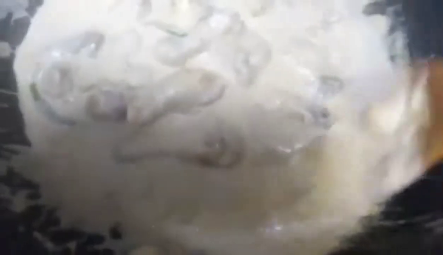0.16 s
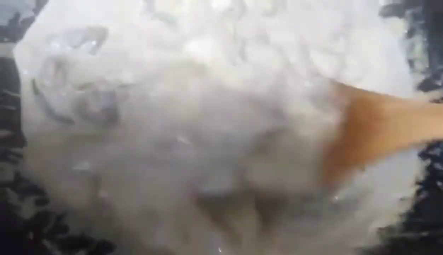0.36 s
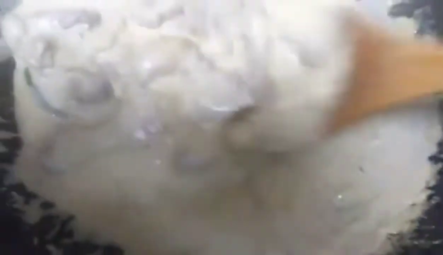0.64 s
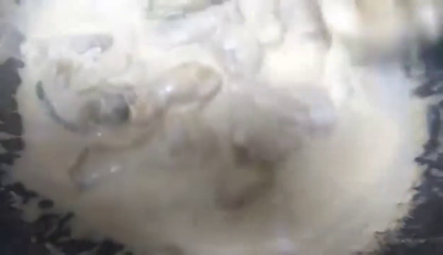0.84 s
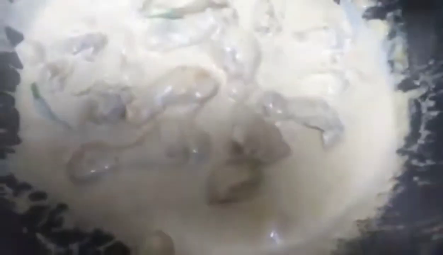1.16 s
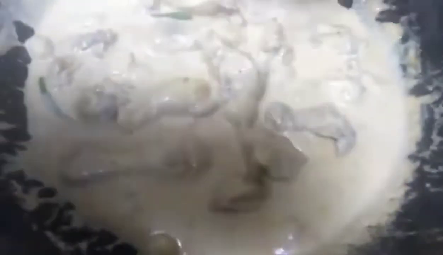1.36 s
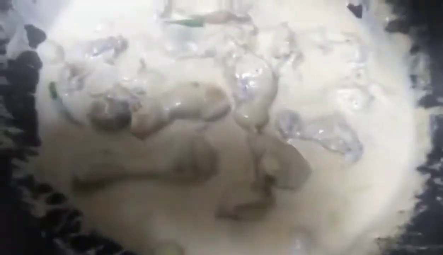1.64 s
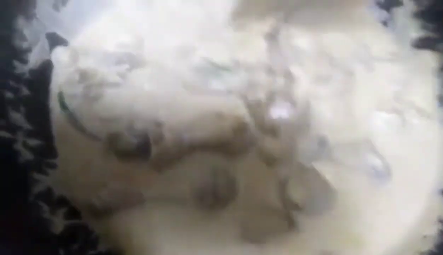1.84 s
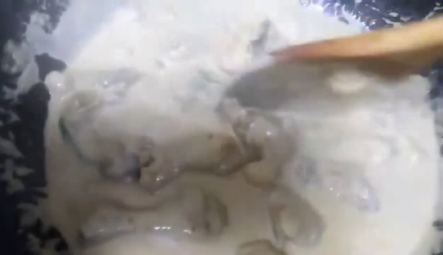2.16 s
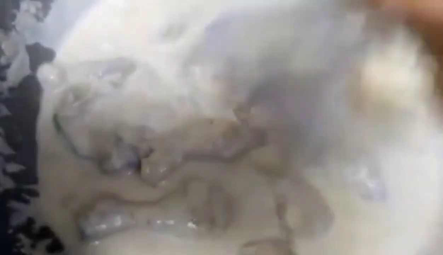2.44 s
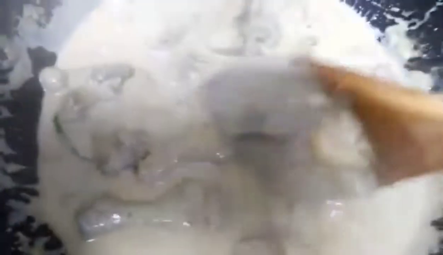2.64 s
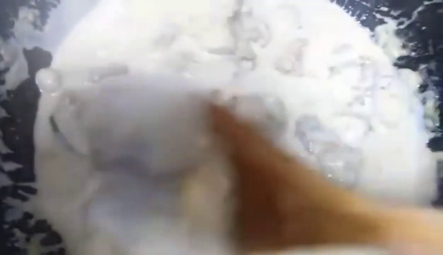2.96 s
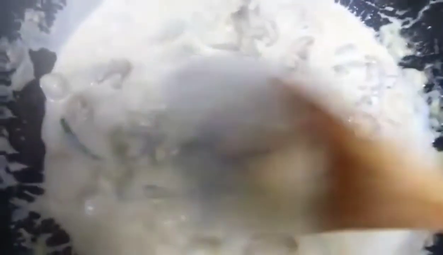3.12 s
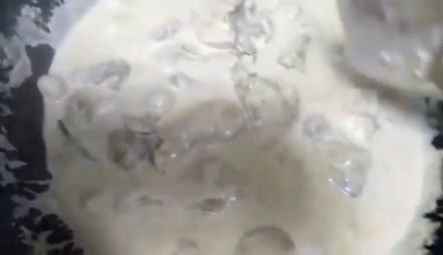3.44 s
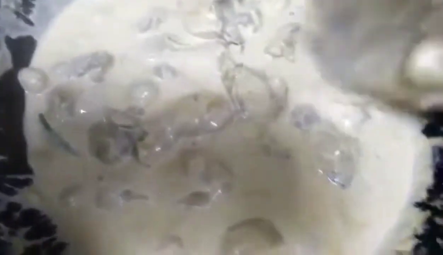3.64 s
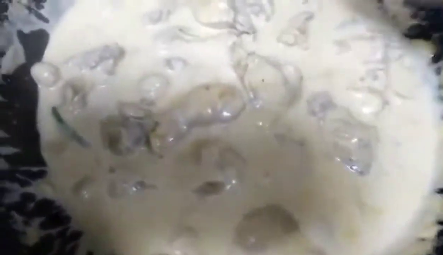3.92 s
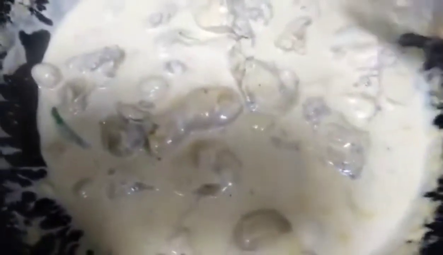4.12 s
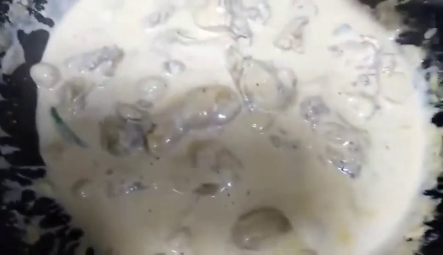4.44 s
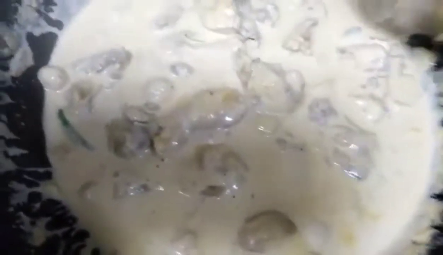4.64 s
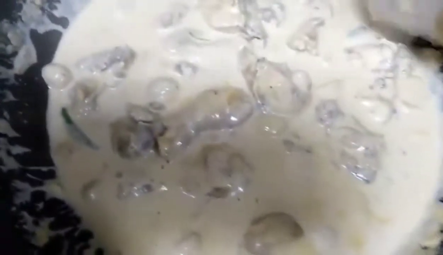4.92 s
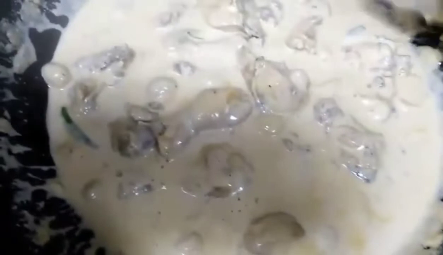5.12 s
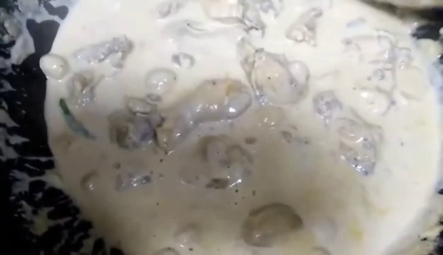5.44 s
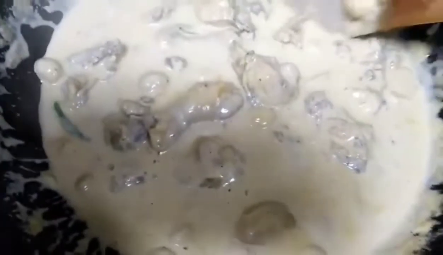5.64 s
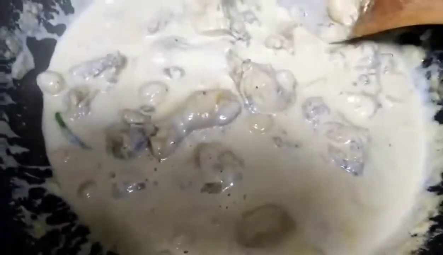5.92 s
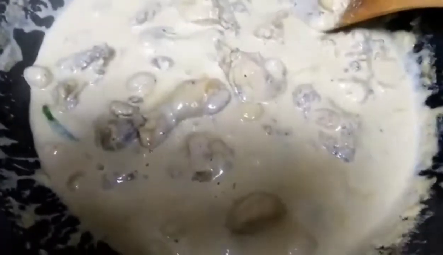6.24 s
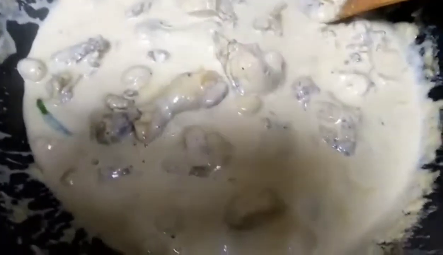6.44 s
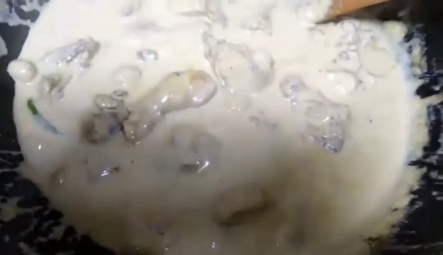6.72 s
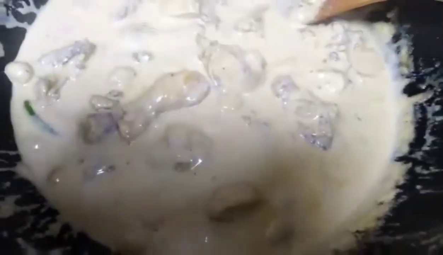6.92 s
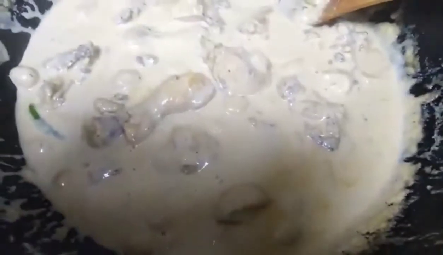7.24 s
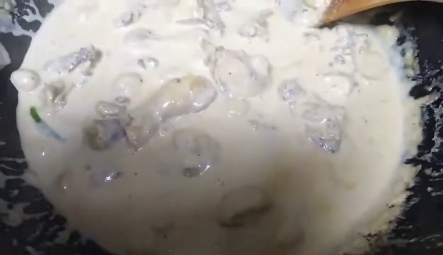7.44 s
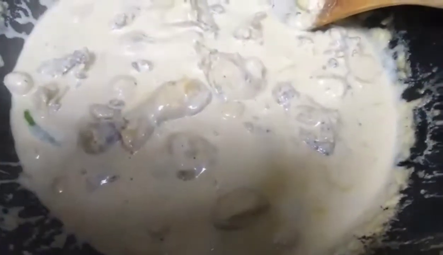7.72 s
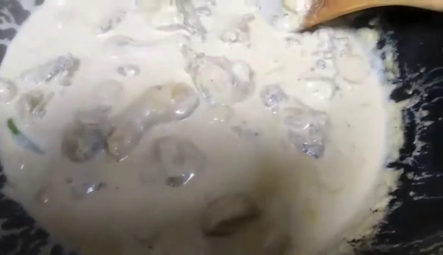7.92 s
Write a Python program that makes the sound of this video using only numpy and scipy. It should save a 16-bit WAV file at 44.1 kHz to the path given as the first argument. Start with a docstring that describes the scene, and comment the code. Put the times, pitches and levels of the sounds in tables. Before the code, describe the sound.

Thick, creamy sauce simmers in a pan close to the microphone, giving irregular small bright pops and occasional lower plops. At the start a wooden spatula scrapes briefly on the rim, with soft dull thuds through the stove. The popping continues, and a second cluster of thuds and plops comes past the middle. Faint fizz, steady hiss and a low hum sit underneath in a small, hard kitchen.

```python
"""In a small, hard kitchen, thick sauce simmers in a pan close to the microphone.
Small steam bubbles snap their films and ring as cavity resonators, giving short bright pops; large
ones resonate lower and plop. The pan's edge fizzes, steam puffs out, and faint thin tones ring.
Friction of a wooden spatula excites the rim, and thuds drive the damped modes of the stove top.
The room reverberates after each bubble, over a steady hiss and a low hum."""
import sys
import numpy as np
from scipy import signal
from scipy.fft import rfft, irfft, next_fast_len
from scipy.io import wavfile
from scipy.ndimage import uniform_filter1d, map_coordinates

SR = 44100
rng = np.random.default_rng(int(sys.argv[2]) if len(sys.argv) > 2 else 0)


def wav_record(signal):
    """Record a signal, one row per channel, as 16-bit PCM in the file named by sys.argv[1]."""
    frames = np.transpose(np.atleast_2d(signal))
    bounded = np.clip(frames, -1, 1)
    # unit amplitude maps onto the largest positive 16-bit level
    quanta = np.round(bounded * 32767).astype(np.int16)
    wavfile.write(sys.argv[1], SR, quanta)


N = 355887

# Small bubbles: t/s, level/dB, f/Hz, balance/dB (left minus right), snap weight/dB, life/cycles
SMALL_BUBBLES = [(0.066, -27.5, 4740, 22.5, -50, 8), (0.1158, -17.5, 4420, 9, -22, 5.4),
                 (0.187, -23, 4160, 3, -40, 2.8), (.3433, -52, 2190, 18, 19, 28),
                 (0.3904, -32.5, 8360, -15, 3, 13), (0.434, -35, 5000, 8, -30, 8.3),
                 (0.441, -31, 4900, 14, -39.5, 42), (0.446, -18.5, 4900, 12, -2, 3.7),
                 (0.452, -33, 4730, 2, 7, 7.2), (0.4812, -25.5, 4650, 7, 10, 10),
                 (0.5, -20, 5100, 10.5, -26, 7.1), (0.784, -30.5, 6700, 13.5, -48, 7.1),
                 (0.826, -37.5, 8450, -10, 14, 4.8), (0.8816, -51.5, 2655, 8, 14, 69),
                 (1.04, -38.5, 6400, 6, -40, 5.4), (1.2252, -29, 5000, 9.5, -0.5, 3.1),
                 (1.406, -32.5, 4640, -2, -17, 6.2), (1.42, -37, 6300, 4, -43, 13),
                 (1.4715, -17, 6500, 3, 3, 6.2), (1.4724, -16, 5550, 2.5, -4, 14),
                 (1.5263, -18.5, 7700, -3, 3, 4.7), (1.599, -38.5, 7100, -15, 3, 6.5),
                 (1.62, -24.5, 6740, 3.5, -48, 8.6), (1.65, -32, 7250, -1, -13, 10),
                 (1.757, -29, 4990, 7.5, -50, 20), (1.807, -48.5, 5800, 28, 6.5, 3.4),
                 (1.898, -40.5, 5330, -6, -1, 28), (1.913, -38, 5400, 10, -43, 7.4),
                 (1.9653, -41.5, 5600, 4, -47, 6.7), (2.107, -29.5, 9430, -13, -1, 7.5),
                 (2.132, -52, 8250, 0, -18, 8), (2.148, -31, 6100, 4, -41, 8.6),
                 (2.178, -31.5, 8300, -3, -2, 19), (2.229, -48.5, 2750, 17, -57, 6.8),
                 (2.2295, -18.5, 6270, 1, -50, 8.6), (2.4057, -29.5, 3380, -7, -40, 7.2),
                 (2.408, -22.5, 8140, -4, -47, 7.5), (2.448, -36, 4780, -6, -46, 12),
                 (2.477, -33.5, 5230, -6, -55, 6.3), (2.517, -24, 7900, -1, -42, 14),
                 (2.528, -28.5, 6400, 0, -35, 14), (2.6, -53, 3050, 36, -48, 13),
                 (2.7342, -36.5, 5300, 15, -46, 8), (2.88, -36.5, 6250, 4, -50, 7.3),
                 (3.015, -26, 5600, 2, -51, 8.3), (3.059, -44.5, 4650, 1, -50, 31),
                 (3.355, -46.5, 5500, 12, -49, 13), (3.3815, -28.5, 7840, -16.5, -34, 5.3),
                 (3.616, -29, 4620, 2, -33, 11.4), (3.8402, -31.5, 6190, 0, -43, 22),
                 (3.895, -47, 7540, -26, -33.5, 6.7), (3.936, -28.5, 5800, 11.5, -54, 10.3),
                 (4.0422, -29, 6000, 9.5, -53, 7.5), (4.085, -40.5, 5330, 15, -56, 17),
                 (4.1586, -32, 11500, 2, -12, 8.1), (4.1604, -14, 14600, -5, -40, 13),
                 (4.1618, -14, 10400, 3, -40, 7), (4.1602, -17, 2580, 4, -50, 8.5),
                 (4.1604, -4, 5340, 6.5, 3.5, 3), (4.403, -24.5, 6500, -3, -44, 7.7),
                 (4.4385, -18.5, 5530, -0.5, -53, 7.4), (4.4903, -17.5, 6100, -5.5, -47, 4),
                 (4.5063, -21.5, 5320, 8, -45, 11), (4.5767, -20.5, 6960, 1, -37, 3.9),
                 (4.628, -23, 6840, 0, -46, 7.2), (4.7303, -48, 3200, 8, -65, 11),
                 (4.7303, -25, 6100, -3, -52, 10), (4.7585, -30.5, 6100, 2, -27, 15),
                 (4.792, -43.5, 8900, -24, 14.5, 18), (4.953, -32.5, 6840, -18, -50, 7.3),
                 (4.983, -33, 5800, 8, -61, 11), (5.012, -22.5, 4940, 10, -48, 12.7),
                 (5.034, -26, 5330, 5.5, -63, 6.2), (5.049, -20.5, 6920, -5, -61, 8.9),
                 (5.079, -28.5, 7580, -12, -55, 8.1), (5.243, -27, 7870, -3, -47, 10.4),
                 (5.256, -49, 2410, 6, -45, 16), (5.3094, -28, 5800, -1, -59, 5.7),
                 (5.3857, -33, 6430, -1, -20, 12), (5.495, -27.5, 5500, -11.5, -44, 11.3),
                 (5.521, -33, 5800, 13, -15, 11), (5.547, -26, 7660, -20.5, -9, 4.4),
                 (5.591, -37, 7200, -6.5, -16, 6), (5.6382, -48, 2610, 9, 13.5, 2.1),
                 (5.7152, -27, 5070, 0, -60, 16.6), (5.748, -40, 7100, -4, -32, 8.2),
                 (5.7958, -47, 7760, -14, -2, 12), (5.832, -21, 6430, -2, -50, 6.8),
                 (5.9192, -36, 4320, -5, -3.5, 11), (5.953, -46.5, 2730, 27, -45, 5.5),
                 (5.99, -50, 6140, 13, 1, 67), (6.0858, -43, 6500, 3, -42, 7.5),
                 (6.133, -26.5, 4520, 12, -17, 16), (6.1565, -46, 4390, 9, -34, 20),
                 (6.163, -47, 4400, 3, -40, 14.6), (6.1897, -33, 4660, 8, -51, 15),
                 (6.246, -41, 4550, 7, -23, 60), (6.298, -32, 6300, -1, -7, 13),
                 (6.376, -20.5, 6670, 1.5, -57, 5.6), (6.493, -40.5, 6130, -8, -49, 18),
                 (6.6394, -32, 5800, 9, -43, 29), (6.692, -32, 7250, 12, -35, 8.1),
                 (6.751, -21.5, 6560, 1, -45, 11.5), (6.7544, -29.5, 4840, 11, -55, 11),
                 (6.8175, -25, 4970, 3, -12.5, 9.9), (6.977, -24, 7700, 1, -27, 11.4),
                 (6.9708, -37.5, 4600, -10, -30, 9), (6.9782, -22.5, 4760, 11, -52, 18),
                 (7.104, -43, 7540, -3, -20, 6.8), (7.2282, -40.5, 5640, 18, -48, 14),
                 (7.268, -34, 6000, 1, -65, 4.5), (7.272, -50, 2980, 28, -56, 53),
                 (7.279, -19, 7100, 0, -31, 7.2), (7.286, -22.5, 7220, 5, -9, 7.3),
                 (7.338, -28, 5960, 7, -55, 6.4), (7.37, -38, 5900, 6, -48, 6.7),
                 (7.4801, -23.5, 7000, 2, -48, 6.7), (7.487, -37.5, 6260, 11, -31, 16),
                 (7.681, -16, 6440, 2, -43, 6.7), (7.681, -43, 2050, 13, -38, 2.7),
                 (7.688, -49, 6500, 3, -36, 8.6), (7.763, -38, 8100, -18, -33, 4.9),
                 (7.808, -32, 7500, -3, -32, 4.5), (7.83, -46, 4650, 17, -50, 35),
                 (7.8427, -22.5, 7230, 6, -48, 7), (7.849, -54, 3050, 29.5, -48, 17),
                 (7.955, -30.5, 5620, 6, -56, 23), (7.972, -22.5, 6700, 7, -52, 18),
                 (8.0622, -19.5, 7400, 4, -20, 4)]
# Large bubbles: t/s, level/dB, f/Hz, balance/dB, life/cycles, reverberant-to-direct ratio/dB
LARGE_BUBBLES = [(0.067, -25, 1140, 1.5, 1.9, 14.5), (0.08, -32, 515, -12, 2.18, 5),
                 (0.346, -47.5, 1710, -20, 18, -3), (0.886, -38.5, 1810, -6, 15.5, -5.5),
                 (1.532, -59.5, 870, -8, 1.9, 26), (1.714, -34, 990, -4, 8, -18),
                 (1.72, -12.5, 987, -3.5, 5.1, -9), (1.766, -12, 1165, -5, 2.85, -4.5),
                 (1.771, -19, 1200, 11, 2.6, -7), (1.772, -37, 228, -5.5, 4, 0),
                 (2.299, -66.5, 281, 22, 7.5, 19), (3.333, -60.5, 1460, 28, 19, -7),
                 (3.611, -27, 2250, 12.5, 10, -0.5), (4.192, -57, 272, 12, 7.9, 10),
                 (4.982, -53, 508, 1, 3.8, 8), (5.739, -25, 590, -4.5, 8, 1), (5.755, -26, 482, 3.5, 6, -4),
                 (5.772, -38, 524, 5, 7, -2), (5.795, -44, 592, 12, 15, -8), (5.881, -39, 1375, 13, 7.2, 7),
                 (5.897, -29.5, 1184, 6.5, 6.1, 6.5), (5.946, -37, 1534, -0.5, 8, 12.5),
                 (5.957, -22, 1100, 5.5, 5.1, -6.5), (6.639, -67.5, 1746, 19, 12.5, 13),
                 (6.833, -40.5, 1098, 12.5, 16.3, -6), (6.975, -41, 382, 9, 11.2, -7),
                 (6.995, -18, 359, -2, 3.5, -4.5), (7.005, -32, 441, -11, 6, -18),
                 (7.055, -39, 275, -4.5, 6, -8), (7.072, -45, 308, -3, 9, -7),
                 (7.876, -41, 987, 0, 9.1, 1.5)]
# Spectrum of a snapping film: f/Hz, level/dB
FILM_SPECTRUM = [(590, -87), (1000, -32), (1650, -49.5), (2480, -0.5), (3630, -7.5), (4430, -27), (5580, 6),
                 (6650, 13), (9100, 5), (10300, 7), (12600, 8.5), (13800, -6.5), (16100, -19.5)]
# Left-right difference of the snap at the microphone ports: f/Hz, balance/dB
FILM_BALANCE = [(60, -7), (180, 8), (550, 5), (1650, 37.5), (4970, -3.5), (15000, -18.5)]
# Frying at the bare edge of the pan: t/s, coarse level/dB, fine level/dB, finest level/dB
FIZZ_LEVELS = [(0.0, -58, -83, -103), (0.2, -61, -83, -63.5), (0.4, -56.5, -51.5, -53.5),
               (0.63, -77, -96, -77), (0.9, -68, -86, -82), (1.302, -80.5, -103, -81),
               (1.66, -69, -70, -79), (2.0, -72.5, -104, -83), (2.67, -69, -58.5, -80),
               (3.1, -104, -79, -83.5), (3.75, -68.5, -78, -82), (4.09, -58.5, -60, -101),
               (4.25, -44.5, -79, -91), (4.4, -81, -90, -107), (4.54, -69, -76, -92), (4.72, -63, -60, -81),
               (4.95, -63, -56, -101), (5.24, -69, -93, -80.5), (5.66, -70.5, -88.5, -84.5),
               (6.199, -74.5, -78.5, -80), (6.61, -70.5, -60.5, -93), (7.08, -73.5, -101, -77.5),
               (7.4, -76, -71, -83), (7.7, -73, -83, -86), (8.07, -58, -94, -84)]
# Puffs of steam: t/s, level/dB, T60/s
STEAM_PUFFS = [(.33, -68, 0.34), (.86, -62, 0.17), (1.845, -49.5, 0.088), (5.96, -54.5, 0.19),
               (6.26, -56, 0.21), (.12, -75, .6), (7.79, -74, 0.13)]
# Faint ringing tones: t/s, level/dB, f/Hz, glide/(Hz/s), T60/s, balance/dB
THIN_TONES = [(.27, -58, 3700, -73, 0.59, 14), (.13, -54, 2236, -1, .6, 5), (1.47, -61, 3540, -3, 0.66, 4),
              (2.16, -63.5, 3550, -6, 0.36, 11), (.3, -59, 2280, -3, 0.25, 18),
              (.5, -62, 3680, -10, 0.72, 14.5), (.48, -58.5, 2300, -700, 0.31, 28),
              (.6, -55, 2200, -300, 0.28, 28.5), (1.08, -67.5, 3494, -1, 0.87, 14),
              (2.07, -72, 3550, -8, 0.5, 15), (2.42, -62, 3930, 1, 0.43, 22),
              (2.42, -56.5, 2900, -1, 0.24, 21), (2.62, -66, 5390, -12, 0.82, 11),
              (2.999, -70.5, 2640, 3, 0.51, 28.5), (3.031, -63.5, 1750, 91, 0.32, 16.5),
              (3.749, -64.5, 3744, 2, 0.25, 29), (3.93, -61.5, 2335, -200, 0.4, 24.5),
              (4.2, -62.5, 2160, -100, 0.68, 20), (4.23, -61.5, 3726, -54, 1, 9.5),
              (5.24, -61, 1600, 0, 0.21, 3), (5.32, -59.5, 1495, -100, 0.33, -5),
              (5.768, -57, 1760, 2, 0.19, 23), (6.191, -64.5, 2685, -1, 0.27, 29),
              (6.96, -59, 3860, -200, 0.88, 6), (7.029, -62, 1750, 11, 0.19, 25.5),
              (7.301, -68.5, 1484, 1, 0.45, -15.5)]
# Shocks through the stove: t/s, boom level/dB, body level/dB, T60/s
STOVE_SHOCKS = [(0.077, -41.5, -38.5, 0.26), (0.13, -29, -54, 0.47), (0.238, -37.5, -56, 0.36),
                (5.282, -35.5, -57, 0.3), (5.37, -36, -72, 0.52), (5.509, -45, -56, 0.21),
                (5.752, -75, -38, 0.36), (5.811, -52, -31, 0.087), (5.898, -35, -34, 0.25),
                (5.914, -30, -27, 0.21), (5.99, -37, -35, 0.15)]
# Low modes of the stove top: f/Hz, level/dB
BOOM_MODES = [(62, -6), (99, 0), (125, -9)]
# Its higher modes: f/Hz, level/dB
BODY_MODES = [(180, 2), (215, -6), (260, -5.5)]
# The spatula catching on the rim: t/s, level/dB, T60/s
SPATULA_CATCHES = [(0.056, -37.5, 1.0), (0.441, -27.5, 0.048), (0.482, -25.5, 0.053), (.782, -36, 0.022)]
# Spectrum of the rubbed pan: f/Hz, level/dB
RIM_SPECTRUM = [(240, -43), (400, -4.5), (1040, -10.5), (1690, -12.5), (1880, -13), (2220, -1),
                (2900, -1.5), (3700, -1), (4880, -7), (6510, -20), (12500, -68), (15000, -82)]
# Spectrum of the background hiss: f/Hz, level/dB
HISS_SPECTRUM = [(13, -31.5), (22, -48.5), (44, -3.5), (101, -4.5), (201, -6), (347, -3), (567, -13),
                 (853, -12), (1400, -18), (2610, -18), (3340, -22), (6090, -24), (7580, -39),
                 (11700, -46.5), (15000, -60.5)]
# Likeness of that hiss in the two channels: f/Hz, coherence
HISS_COHERENCE = [(60, 0.25), (250, 1), (1000, 0.22), (3000, 0.028), (15000, 0.08)]
# Partials of the hum: f/Hz, level/dB
HUM_PARTIALS = [(100, -69.5), (180, -81), (272, -76), (360, -84.5)]
# Reverberation time of the kitchen: f/Hz, T60/s
ROOM_T60 = [(150, 0.22), (1000, 0.24), (5000, 0.18), (12000, 0.14), (13500, 0.054)]
# Likeness of the reverberation in the two channels: f/Hz, coherence
ROOM_COHERENCE = [(200, 1), (700, 0.86), (2000, 0.044)]
# The highest treble is dulled above 13 kHz: f/Hz, gain/dB
TREBLE_ROLLOFF = [(12800, -0.5), (13600, -11), (16000, -12.5)]

BUBBLE_SAMPLES, BURST_S = 2048, 0.014  # length of a bubble's sound; instant of rupture within a pop
FRAY_S, STEAM_S = 0.0006, 0.0021  # time constants around the rupture
STEAM_DB, PAT_DB = -15.5, -27.5
ONSET_S, ONSET_DB = 0.0032, -9  # a faint hiss swells just before each pop
LAG_SAMPLES, LAG_SPREAD = 11, 9  # the left port hears later; bubbles burst all over the pan
GLANCE_S, GLANCE_DB = 0.0012, -0.5  # range of delay and greatest gain of the pan wall's reflection
SPATTER_DB, SPATTER_T60_S = -37.5, 0.35
PAN_DB, PAN_T60_S = -57, 0.69
WALL_S, WALL_GAIN = 0.00842, 1.6  # one clear echo from a near wall
TOP_HZ = 16300


def small_bubbles(rooms):
    """Direct sound falls with distance: fainter pops are farther away, so more reverberant."""
    out = np.zeros((2, N + SR))
    for k, (s, db, hz, balance_db, snap_db, cycles) in enumerate(SMALL_BUBBLES + tiny_bubbles()):
        place, *glances = rng.uniform(-1, 1, size=3)
        sound = amp(db) * pop(hz, balance_db, snap_db, cycles, glances)
        lag = LAG_SAMPLES + round(LAG_SPREAD * place)
        room_db = -1.5 - 0.1444 * (max(db, -45) + 33.5)
        tail = rooms[k % len(rooms)]
        if k >= len(SMALL_BUBBLES):
            tail = tail[:, :4000]  # tiny pops sink into the hiss early
        add_in_room(out, s + 0.001096 - BURST_S, sound, lag, room_db, tail)
    return out[:, :N]


def pop(hz, balance_db, snap_db, cycles, glances):
    """Impulse excitation: a film frays and snaps, the cavity rings, and the pan wall reflects both."""
    t = np.arange(BUBBLE_SAMPLES) / SR
    freqs = np.fft.rfftfreq(len(t), 1 / SR)
    from_burst = np.abs(t - BURST_S)
    tear = np.arange(len(t)) == round(BURST_S * SR)
    fray = rng.standard_normal(len(t)) * np.exp(-from_burst / FRAY_S)
    film = amp(along(FILM_SPECTRUM, freqs) + along(FILM_BALANCE, freqs) * [[.5], [-.5]])
    snap = irfft(rfft(tear + 0.92 * fray) * film)
    soft_onset = amp(ONSET_DB) * np.exp(-from_burst / ONSET_S) * (t < BURST_S)
    rush = rfft(rng.standard_normal((2, len(t))) * (np.exp(-from_burst / STEAM_S) + soft_onset))
    hiss = irfft(rush * band(freqs, hz, hz / 4.8) ** 4)  # coloured by the cavity
    pat = irfft(rush * band(freqs, 2000, width_hz=2700) ** 2)  # the sauce falls back
    tone = cavity(hz, cycles, rise=0.021, peak_s=BURST_S)
    ring = tone + at_peak(hiss, STEAM_DB) + at_peak(pat, PAT_DB)
    direct = sides(balance_db) * ring + at_peak(snap, snap_db - 4.5)
    reflected = [glance * np.roll(channel, round(abs(glance) * GLANCE_S * SR) + 6)
                 for glance, channel in zip(glances, direct)]
    return direct + amp(GLANCE_DB) * np.array(reflected)


def cavity(hz, cycles, rise, peak_s):
    """Cavity resonance: a few cycles of climbing pitch under a Gaussian envelope."""
    age = (np.arange(BUBBLE_SAMPLES) / SR - peak_s) * hz / cycles
    return np.exp(-(age / .25) ** 2) * np.cos(2 * np.pi * cycles * (age + rise * age * age / 2))


def tiny_bubbles():
    """Random bursting: some bubbles follow the fizz in level, others are freed by a larger neighbour."""
    rows = []
    fizz_s, coarse_db = np.transpose(FIZZ_LEVELS)[:2]
    for when, strength, pitch, side in rng.random((110, 4)):
        s = when * N / SR
        db = np.interp(s, fizz_s, coarse_db) + 4 + 9 * strength ** 2
        rows.append((s, db, 4600 + 3800 * pitch, 12 * side - 3, -35, 18))
    for s, db, hz, balance_db, *_ in rng.choice(SMALL_BUBBLES, size=150):
        wait, strength, pitch, side = rng.random(4)
        s = min(s + 0.0044 - 0.03 * np.log(wait), N / SR)
        db = min(db, -22) - 23.5 + 7.5 * strength
        rows.append((s, db, hz * (0.87 + 0.28 * pitch), balance_db + 8 * (side - .5), -35, 12))
    return rows


def large_bubbles(rooms):
    """A larger cavity resonates lower: these bubbles plop, without a snap."""
    out = np.zeros((2, N + SR))
    for k, (s, db, hz, balance_db, cycles, room_db) in enumerate(LARGE_BUBBLES):
        plop = amp(db) * sides(balance_db) * cavity(hz, cycles, rise=0.037, peak_s=0.563 * cycles / hz)
        add_in_room(out, s, plop, LAG_SAMPLES // 6, room_db, rooms[k % len(rooms)])
    return out[:, :N]


def fizz():
    """Incoherent addition: frying bubbles of three sizes merge into three bands of grainy noise."""
    layers = [noise(lambda f: band(f, hz, width_hz) ** 3, [(hz, .3)], patchy_db=6) * sides(balance_db)
              for hz, width_hz, balance_db in [(5800, 3330, 4), (7760, 1320, 3.5), (10380, 9100, -2)]]
    s, *levels_db = np.transpose(FIZZ_LEVELS)
    crackle_db = -2.5 * flicker(samples=90)
    clumps_db = 3.5 * flicker(samples=700)
    swells = [amp(np.interp(np.arange(N) / SR, s, db)) for db in levels_db]
    return unit(amp(crackle_db + clumps_db)) * sum(swell * layer for swell, layer in zip(swells, layers))


def spatter_and_pan_ring():
    """Free decay: each snap leaves spatter, and each pop excites a mode of the pan."""
    s, pop_db, _, _, snap_db, _ = np.transpose(SMALL_BUBBLES)
    spray = noise(lambda hz: band(hz, 7000, width_hz=9000) ** 2 / (1 + (hz / 12500) ** 16),
                  [(7000, .3)], patchy_db=5)
    mode = noise(lambda hz: band(hz, 2650, width_hz=95) ** 2, [(2660, 0.28)], patchy_db=7)
    spatter = struck_envelope(s, SPATTER_DB + pop_db + snap_db, SPATTER_T60_S) * spray
    ring = struck_envelope(s, PAN_DB + 0.52 * pop_db, PAN_T60_S) * mode
    return spatter * sides(-1.5) + ring * sides(17)


def steam_puffs():
    """Flow noise: thin steam escapes in short puffs of high hiss."""
    hiss = noise(lambda hz: band(hz, 11700, width_hz=3200) ** 3, [(11800, 0.19)], patchy_db=2)
    return swelling_envelope(STEAM_PUFFS, rise_s=0.015) * hiss * sides(-8)


def thin_tones(width_hz=45, rise_s=0.0037):
    """Random modulation: faint tones, each a steady core plus narrow-band noise, glide and falter."""
    out, t = np.zeros((2, N + SR)), np.arange(2 * SR // 3) / SR
    for s, db, hz, glide, t60, balance_db in THIN_TONES:
        white = rng.standard_normal((2, 2, len(t)))
        in_phase, quadrature = filtered(white, lambda f: 1 / (1 + (f / width_hz) ** 2))
        core = 1.3 * in_phase.std()
        phase = 2 * np.pi * (hz * t + glide * t * t / 2)
        falter = amp(3 * unit(filtered(rng.standard_normal(len(t)), lambda f: f < 15)))
        tone = unit(falter * ((in_phase + core) * np.cos(phase) + quadrature * np.sin(phase)))
        envelope = amp(db - 60 * (t / t60) ** 2) * (1 - np.exp(-t / rise_s))
        out[:, round(s * SR):][:, :len(t)] += envelope * sides(balance_db) * tone
    return out[:, :N]


def stove_thuds(rise_s=0.002):
    """Modal vibration: dull shocks ring the stove top, a little differently each time."""
    out, t = np.zeros((2, N + SR)), np.arange(SR // 2) / SR
    attack = (1 - np.exp(-t / rise_s)) ** 2
    for s, boom_db, body_db, t60 in STOVE_SHOCKS:
        for modes, shock_db in [(BOOM_MODES, boom_db), (BODY_MODES, body_db)]:
            for hz, db in modes:
                detune, offset, skew = rng.uniform(-1.24, 1, size=3)
                start_phase = np.pi * offset + .8 * skew * np.array([[1], [-1]])
                mode = np.sin(2 * np.pi * hz * (1 + 0.027 * detune) * t + start_phase)
                out[:, round(s * SR):][:, :len(t)] += amp(shock_db + db - 60 * t / t60) * attack * mode
    return out[:, :N] * sides(-1)


def spatula():
    """Friction: wood catches on the rim in short grains that excite the pan."""
    grit = amp(2 * flicker(samples=120))
    rub = noise(lambda hz: amp(along(RIM_SPECTRUM, hz)), [(500, 0.47), (5000, 0.18)], patchy_db=4.5)
    return swelling_envelope(SPATULA_CATCHES, rise_s=0.013) * unit(grit * rub) * sides(1.9)


def kitchen_background(hiss_db=-61, waver_db=4.5):
    """Continuous and line spectra: burner and room hiss over a hum that wavers in level and phase."""
    hiss = amp(hiss_db) * noise(lambda hz: amp(along(HISS_SPECTRUM, hz)), HISS_COHERENCE, patchy_db=2.5)
    t = np.arange(N) / SR
    drift = lambda: map_coordinates(rng.standard_normal(60), [t * 5])
    hum = sum(np.sqrt(2) * amp(db + waver_db * drift()) * np.sin(2 * np.pi * hz * t + 0.51 * drift())
              for hz, db in HUM_PARTIALS)
    return hiss + hum * sides(-2.8)


def room_responses(count, uneven_db=5):
    """Reverberation: each frequency decays at its own rate; near surfaces answer first and loudest."""
    hz, t, spectra = signal.stft(rng.standard_normal((count, 2, 13312)), SR, nperseg=256)
    coherence = along(ROOM_COHERENCE, hz)[:, None]
    spectra[:, 1] = coherence * spectra[:, 0] + np.sqrt(1 - coherence ** 2) * spectra[:, 1]
    colour = patches(rng.standard_normal(spectra[:, :1].shape), bins=3, frames=9)
    spectra *= amp(uneven_db * colour * (hz > 2000)[:, None])
    decay = amp(-60 * (t / along(ROOM_T60, hz)[:, None]) ** 1.6)  # lingers, then drops
    tail = signal.istft(spectra * decay, SR, nperseg=256)[1]
    t = np.arange(tail.shape[-1]) / SR
    early = 3.9 * np.exp(-t / 0.008)
    wall = WALL_GAIN * np.exp(-((t - WALL_S) / 0.00015) ** 2)
    tail *= (1 + early + wall) * (t > .0011)
    return tail / np.linalg.norm(tail, axis=-1, keepdims=True)


def add_in_room(out, s, pair, lag, room_db, tail):
    """Convolution: adds a sound and its reverberation at time s, the left channel lag samples late."""
    pair = np.array([np.pad(pair[0], (lag, 0)), np.pad(pair[1], (0, lag))])
    heard = signal.fftconvolve(pair, tail, axes=1)
    heard *= amp(room_db) * np.linalg.norm(pair) / np.linalg.norm(heard)
    heard[:, :pair.shape[1]] += pair
    start = max(round(s * SR), 0)
    out[:, start:start + heard.shape[1]] += heard


def swelling_envelope(events, rise_s):
    """Gains that rise and decay exponentially, summed in power."""
    power, t = np.zeros(N + SR), np.arange(SR) / SR
    for s, db, t60 in events:
        power[round(s * SR):][:SR] += (amp(db - 60 * t / t60) * (1 - np.exp(-t / rise_s))) ** 2
    return np.sqrt(power[:N])


def struck_envelope(s, db, t60):
    """Leaky integration of power: a gain that jumps at times s and decays."""
    kicks = np.zeros(N)
    np.add.at(kicks, np.minimum(np.round(s * SR).astype(int), N - 1), amp(db) ** 2)
    return np.sqrt(signal.lfilter([1], [1, -amp(-120 / t60 / SR)], kicks))


def noise(response, coherence, patchy_db):
    """Partly coherent stereo noise of rms 1, with patches of random gain."""
    spectra = signal.stft(rng.standard_normal((2, N), dtype=np.float32), nperseg=512)[2]
    field = patches(rng.standard_normal(spectra.shape[1:], dtype=np.float32), bins=5, frames=10)
    pair = signal.istft(spectra * amp(patchy_db * 2 * np.tanh(field / 2)), nperseg=512)[1][:, :N]
    angle = lambda hz: np.arccos(along(coherence, hz)) / 2
    mid, side = filtered(pair, lambda hz: response(hz) * [np.cos(angle(hz)), np.sin(angle(hz))])
    return unit(np.array([mid + side, mid - side]))


def patches(field, bins, frames):
    """A field smoothed over frequency and time, rms 1."""
    return unit(uniform_filter1d(uniform_filter1d(field, bins, axis=-2), frames, axis=-1))


def flicker(samples):
    """A moving average of white noise, rms 1."""
    return unit(uniform_filter1d(rng.standard_normal(N), samples))


def filtered(x, response):
    """Linear filtering by a frequency response."""
    size = next_fast_len(x.shape[-1] + min(x.shape[-1], 8192))
    return irfft(rfft(x, size) * response(np.fft.rfftfreq(size, 1 / SR)), size)[..., :x.shape[-1]]


def band(hz, centre_hz, width_hz):
    """A second-order resonance of peak gain 1."""
    return 1j * hz * width_hz / (centre_hz ** 2 - hz ** 2 + 1j * hz * width_hz)


def along(points, hz):
    """Interpolation of (f/Hz, value) points on a logarithmic axis."""
    freqs, values = np.transpose(points)
    return np.interp(np.log(hz + 1), np.log(freqs + 1), values)


def sides(balance_db):
    """Left and right gains for a level difference."""
    return amp([[balance_db / 2], [-balance_db / 2]])


def amp(db):
    """Amplitude ratio of a level in dB."""
    return 10 ** (np.asarray(db) / 20)


def at_peak(x, db):
    """Normalisation to a peak level."""
    return amp(db) * x / np.abs(x).max()


def unit(x):
    """Normalisation to rms 1."""
    return x / np.sqrt(np.mean(x ** 2) + 1e-20)


def scene():
    """Superposition of all sources at the two microphone ports."""
    rooms = room_responses(count=24)
    sauce = small_bubbles(rooms) + large_bubbles(rooms) + fizz() + spatter_and_pan_ring() + steam_puffs()
    return sauce + thin_tones() + stove_thuds() + spatula() + kitchen_background()


def record(dry):
    """Saturation and band limiting: peaks round off near full scale; the highest treble falls away."""
    limited = dry / (1 + np.abs(dry / .99) ** 16) ** (1 / 16)
    dulled = filtered(limited, lambda hz: amp(along(TREBLE_ROLLOFF, hz)))
    return filtered(dulled, lambda hz: np.clip((TOP_HZ - hz) / 300, 0, 1) ** 2)


dry = scene()
out = record(dry)
wav_record(out)
```